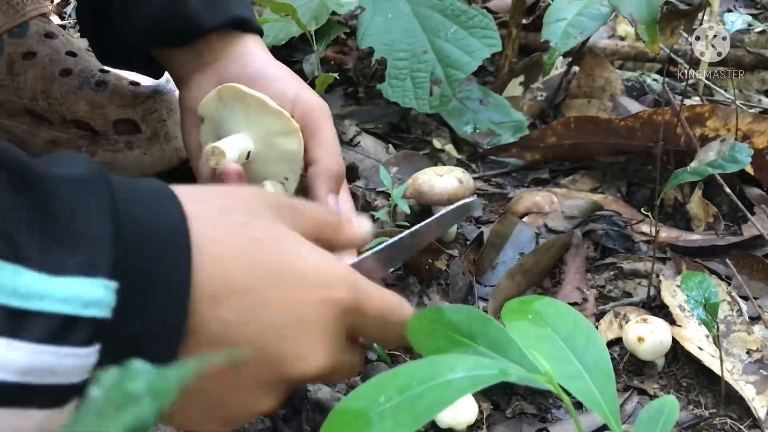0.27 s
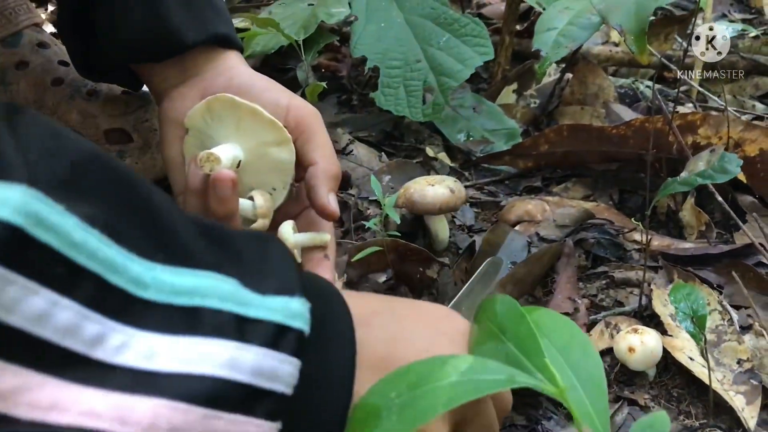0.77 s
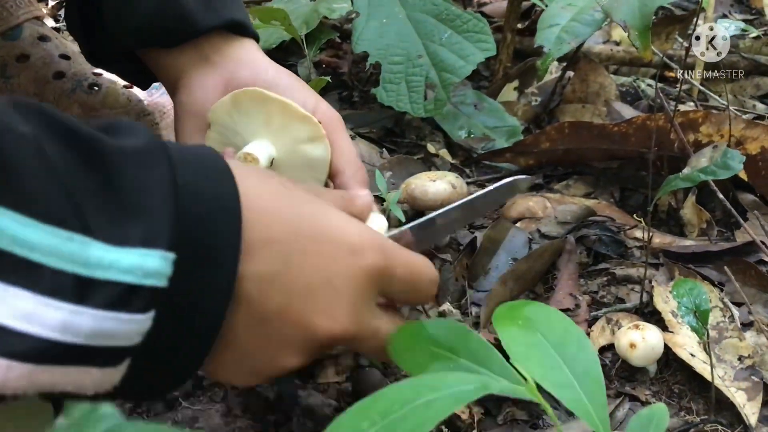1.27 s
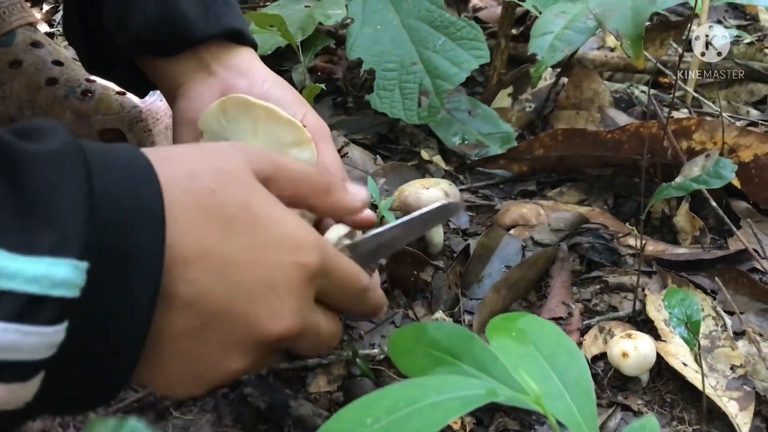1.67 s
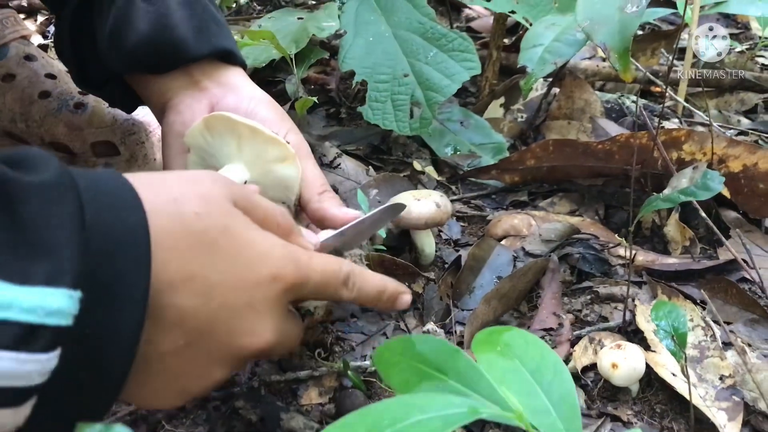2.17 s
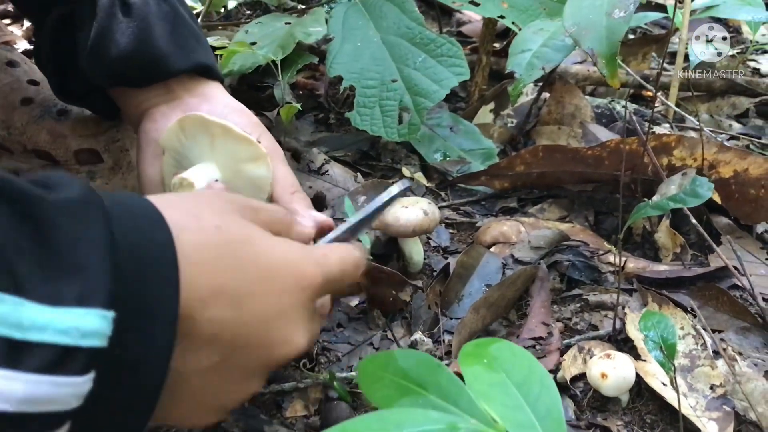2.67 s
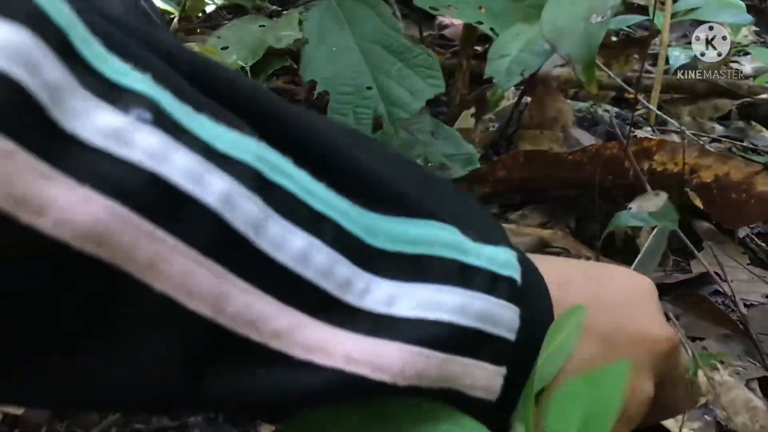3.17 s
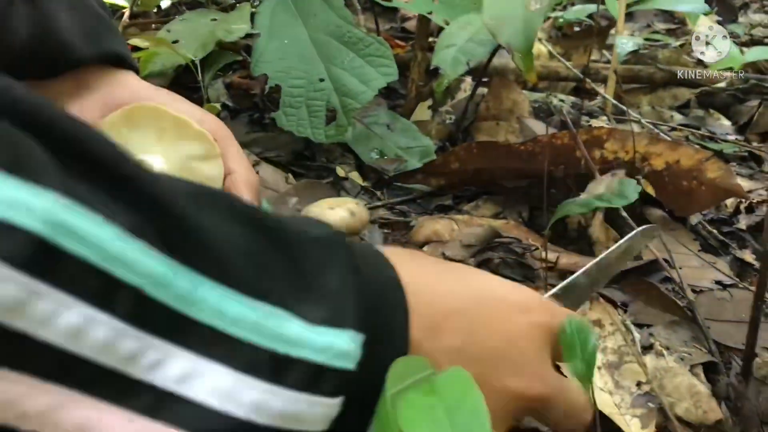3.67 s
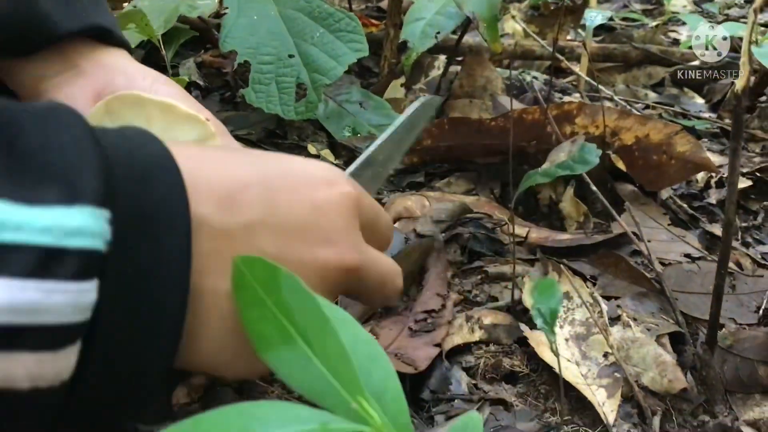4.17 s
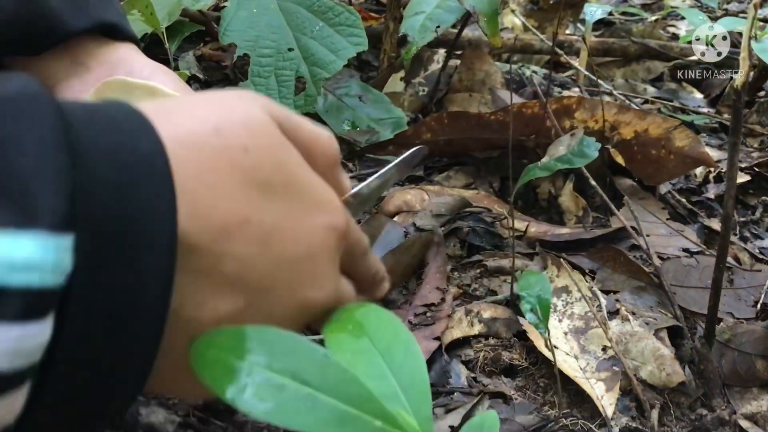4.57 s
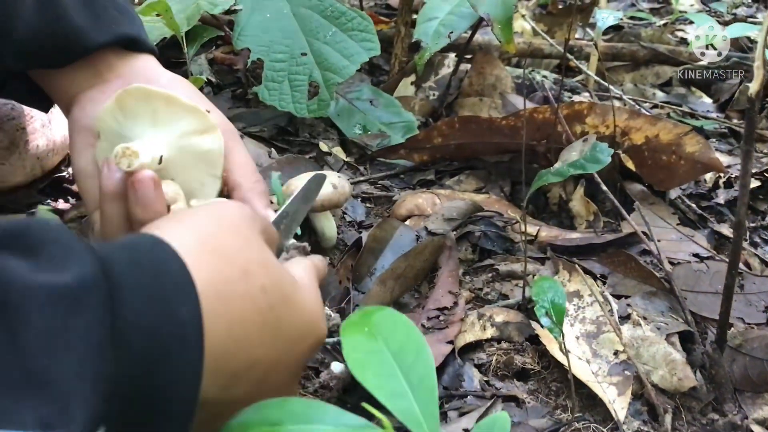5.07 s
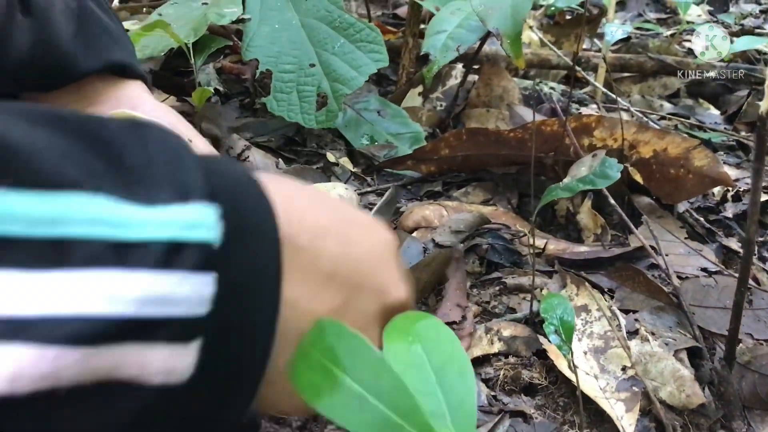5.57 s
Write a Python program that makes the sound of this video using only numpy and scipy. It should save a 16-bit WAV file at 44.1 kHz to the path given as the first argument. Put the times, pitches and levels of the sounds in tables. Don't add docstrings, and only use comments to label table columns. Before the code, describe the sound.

A steady, shrill cicada buzz fills a daytime forest while a knife clicks through stems and dry leaves crackle close by.

```python
import sys
import numpy as np
from scipy import signal
from scipy.fft import rfft, irfft, next_fast_len
from scipy.io import wavfile
from scipy.ndimage import uniform_filter1d

SR = 44100
rng = np.random.default_rng(int(sys.argv[2]) if len(sys.argv) > 2 else 0)


def wrap_up_sound(samples):
    columns = np.atleast_2d(samples).T
    tamed = np.clip(columns, -1, 1)
    steps = np.round(tamed * 32767).astype(np.int16)
    wavfile.write(sys.argv[1], SR, steps)


def gain_from_db(level_db):
    decades = np.asarray(level_db, float) / 20
    return 10 ** decades


N = 256785


def colour(x, points):
    hz, db = np.transpose(points)
    size = next_fast_len(len(x))
    f = np.maximum(np.arange(size // 2 + 1) * SR / size, 1)
    gain = gain_from_db(np.interp(np.log(f), np.log(hz), db))
    return irfft(rfft(x, size) * gain, size)[:len(x)]


def ring(x, hz, width_hz):
    b, a = signal.iirpeak(min(hz, .45 * SR), hz / width_hz, SR)
    return signal.lfilter(b, a, x)


def unit(x):
    return x / np.sqrt(np.mean(x ** 2))


def curves(table):
    s, *columns = np.transpose(table)
    return [np.interp(np.arange(N) / SR, s, column) for column in columns]


def walk(rate):
    hold = max(int(SR / rate), 2)
    steps = np.repeat(rng.standard_normal(N // hold + 1), hold)
    smooth = uniform_filter1d(uniform_filter1d(steps, hold), hold)
    return unit(smooth[:N])


def swell(start, length, rise, fall):
    along = (np.arange(N) / SR - start) / length
    return np.clip(np.minimum(along / rise, (1 - along) / fall), 0, 1)


def clicks(hz, first, last, uneven_db):
    cycles = np.cumsum(hz) / SR + rng.random()
    strengths = gain_from_db(uneven_db * rng.standard_normal(N // 50))
    size = strengths[(cycles + .5).astype(int)]
    half = np.pi * (cycles % 1) + 1e-9
    return size * (np.sin((2 * last + 1) * half) - np.sin((2 * first - 1) * half)) / np.sin(half)


def foliage(x, t60, wet_db):
    t = np.arange(SR // 2) / SR
    echo = rng.standard_normal(len(t)) * np.exp(-np.log(1000) * t / t60)
    echo *= gain_from_db(wet_db) / np.sqrt(np.sum(echo ** 2))
    echo[0] = 1
    lead_in = x[:len(t)][::-1]
    heard = signal.fftconvolve(np.concatenate([lead_in, x]), echo)
    return unit(heard[len(t):len(t) + N])


def near_cicadas():
    # (time [s], click rate [Hz], spread between singers [0-1])
    group = [(0, 294, .008), (.5, 294.5, .008), (.9, 297, .008), (1.7, 298.5, .007), (3.17, 300.3, .008),
             (3.2, 319.5, .011), (4.2, 320.4, .011), (5.82, 320.2, .011)]
    # (time [s], level [dB])
    chorus = [(0, -47.5), (.4, -48.5), (.9, -49), (1.6, -48), (2.4, -47), (3.2, -49), (3.7, -49.5),
              (4.2, -47.5), (4.8, -48), (5.3, -47), (5.82, -50.5)]
    # (frequency [Hz], gain [dB])
    tymbal = [(4000, -50), (4800, -38), (5070, -27), (5350, -18), (5650, -5), (5950, 0), (6250, -.7),
              (6570, -7.5), (6850, -8), (7050, -18), (7400, -19.5), (7700, -28), (9000, -30), (10300, -33)]
    (hz, spread), (db,) = curves(group), curves(chorus)
    out = 0
    for place in np.arange(-3, 4) / 3:
        waver = 1 + spread * place + .002 * walk(40) + .0014 * walk(4)
        strength = gain_from_db(3.2 * walk(16) - 2.5 * place ** 2)
        out = out + strength * clicks(hz * waver, 14, 34, uneven_db=1.8)
    return gain_from_db(db) * foliage(colour(out, tymbal), t60=.22, wet_db=4.5)


def far_cicada(hz, level, orders):
    cycles = np.cumsum(hz * (1 + .0003 * walk(9))) / SR
    out = 0
    for k, db in orders:
        out = out + gain_from_db(db + 0.46 * walk(4.9)) * np.cos(2 * np.pi * k * cycles + k * k)
    return gain_from_db(curves(level)[0]) * out


def far_cicadas():
    # (time [s], level [dB])
    low_level = [(0, -74), (2, -70), (3.1, -65), (4, -65), (4.6, -69), (5.3, -70), (5.82, -78)]
    high_level = [(0, -78), (.7, -72), (1, -66), (1.5, -68), (1.9, -80), (3.7, -80), (4.1, -70),
                  (5.82, -68)]
    # (multiple of the click rate, level [dB])
    low_orders = [(16, -15), (17, 2), (18, 4.5), (19, -26.5), (20, -7)]
    high_orders = [(19, -25), (20, 11), (21, -11), (22, -8)]
    return far_cicada(329.6, low_level, low_orders) + far_cicada(304.8, high_level, high_orders)


def katydid(wing, glide):
    hz, high_hz, width, low_db = wing
    rate = hz * (1 + glide + .003 * walk(5) + .002 * walk(30))
    mid = int(round(high_hz / hz / 4))
    high = clicks(2 * rate, 2 * mid - 3, 2 * mid + 3, uneven_db=2.5)
    low = clicks(rate, mid - 1, mid + 2, uneven_db=4)
    high_mode = unit(ring(ring(high, high_hz, width), high_hz, width))
    low_mode = unit(ring(low, high_hz / 4, 85))
    return foliage(high_mode + gain_from_db(low_db) * low_mode, t60=.15, wet_db=3)


def katydids():
    # (first start [s], period [s], length [s], level [dB], fading [dB/s])
    songs = [
        (-.03, .636, .44, -70, -.5),
        (-.36, .735, .72, -71.5, .2),
        (.2, .86, .56, -76.5, .1),
    ]
    # (stroke rate [Hz], high mode [Hz], width [Hz], low mode level [dB])
    wings = [
        (68.1, 10600, 260, -7),
        (68.2, 10860, 300, -9),
        (68.1, 11520, 330, -30),
    ]
    sag = .008
    t, out = np.arange(N) / SR, 0
    for (first, period, length, db, fading_db), wing in zip(songs, wings):
        along = (t - first) % period / length
        envelope = np.clip(5 * np.minimum(along, 1 - along), 0, 1)
        phrase = gain_from_db(db + fading_db * t + 1.2 * walk(3)) * envelope
        out = out + phrase * katydid(wing, -sag * (np.minimum(along, 1) - .5))
    return out


def crackle(rate, spread_db, tail_s):
    breaks = (rng.random(N) < rate / SR) * gain_from_db(spread_db * rng.exponential(size=N))
    t = np.arange(SR // 40) / SR
    return signal.fftconvolve(breaks, np.exp(-t / tail_s))[:N] * rng.standard_normal(N)


def litter():
    # (start [s], length [s], crackle level [dB], crisp top re crackle [dB])
    rustles = [(0.028, 0.015, -72, 5), (0.16, 0.4, -67, -0.5), (.36, 0.43, -63.5, -8),
               (0.556, 0.13, -69.5, 6), (0.676, 0.13, -59, -4.5), (0.81, 0.77, -70.5, -3),
               (1.17, 0.28, -65, -18), (1.383, 0.034, -53, -14), (1.647, 0.18, -61.5, -12),
               (2.06, 0.18, -69, -4), (2.316, 0.094, -69, 3), (2.39, 0.038, -55.5, -6),
               (2.452, 0.056, -56.5, -22), (2.52, 0.15, -63.5, -4), (2.71, 0.38, -67, -2),
               (2.878, 0.17, -69, 0), (2.988, 0.32, -58.5, -7.5), (3.15, 0.078, -48, -19),
               (3.209, 0.087, -57, -9), (3.27, 0.29, -64.5, -4), (3.486, 0.3, -66, -2),
               (3.662, 0.29, -67, -4), (3.85, 0.48, -61.5, -5), (4.099, 0.2, -64.5, -1),
               (4.226, 0.48, -68.5, -15), (5.307, 0.1, -64.5, 2), (5.394, 0.029, -56, -7),
               (5.465, 0.082, -65.5, 0), (5.513, 0.15, -61, 1.5), (5.604, 0.33, -61, -4.5)]
    rest_db, rest_top_db, rest_soil_db = -76, -75, -67
    soil_re_crackle_db, dig_s = -2, 0.071
    pushes = np.array([swell(s, length, rise=0.19, fall=0.83) for s, length, _, _ in rustles])
    _, length, db, top_db = np.transpose(rustles)
    push = gain_from_db(db) @ pushes
    crisp = gain_from_db(db + top_db) @ pushes
    dig = (gain_from_db(db + soil_re_crackle_db) * np.minimum(length / dig_s, 1)) @ pushes
    mid = colour(crackle(1000, 3.2, .0015), [(150, -76), (600, 4.5), (1500, -1.0), (3500, 1.5),
                                             (5000, -2.0), (8000, -10.5), (16000, -9.5)])
    top = colour(crackle(3000, 4.3, 0.002), [(3000, -18.0), (7500, -6.0), (10000, -8.5),
                                             (13000, -9), (16000, -15.0)])
    soil = colour(rng.standard_normal(N), [(25, -7.5), (60, -0.5), (200, -3.5), (450, -9.5),
                                           (1200, -21.0), (16000, -101)])
    out = np.hypot(gain_from_db(rest_db), push) * unit(mid)
    out += gain_from_db(5.5) * np.hypot(gain_from_db(rest_top_db), crisp) * unit(top)
    return out + gain_from_db(-3) * np.hypot(gain_from_db(rest_soil_db), dig) * unit(soil)


def add_impact(out, s, decay_s, modes):
    t = np.arange(SR // 15) / SR
    burst = rng.standard_normal(len(t)) * np.exp(-t / max(decay_s, 1e-4)) * np.minimum(t / 0.00034, 1)
    i = int(s * SR)
    for hz, width, db in modes:
        mode = ring(ring(burst, hz, width), hz, 1.6 * width)
        out[i:i + len(t)] += (gain_from_db(db) / np.abs(mode).max() * mode)[:N - i]


def knife():
    # (time [s], peak [dB], ring [Hz], body re peak [dB])
    snaps = [(0.0398, -24, 4000, -20.5), (0.057, -50, 3800, -6), (0.42, -48, 2650, -10),
             (0.446, -45.5, 2570, -15), (0.527, -49, 3200, -17), (0.535, -44.5, 2770, -7),
             (0.682, -46, 4380, -2), (0.693, -39, 4160, -6.5), (0.986, -51, 4400, 0),
             (1.298, -43.5, 3120, -29), (1.399, -47, 3380, -16), (1.722, -47, 4270, -5),
             (2.399, -39, 3340, -6), (2.44, -47, 2700, -4), (2.473, -46, 3000, -6), (5.343, -46, 3500, -22),
             (2.581, -47, 2400, -3), (2.903, -52, 4280, -20), (3.183, -43, 4200, 3), (3.219, -47, 2800, -2),
             (3.398, -58, 2570, 13.5), (4.021, -44, 2650, -1), (5.324, -46, 3560, -24),
             (5.398, -48, 3360, -5), (5.536, -46, 4400, -22), (5.656, -44.5, 3370, -6),
             (5.74, -53, 3430, -7), (5.784, -51.5, 3630, 7)]
    # (time [s], peak [dB], ring [Hz], body re peak [dB])
    tears = [
        (0.206, -47, 3230, -24),
        (1.383, -43, 3050, 5.5),
        (2.464, -45.5, 2650, 0.5),
        (3.17, -35, 3050, -2.5),
        (5.351, -38.5, 3340, -27),
    ]
    # (time [s], peak [dB])
    blade_taps = [(0.19, -58), (0.374, -50), (0.469, -57), (0.717, -54), (1.227, -48), (1.664, -55),
                  (2.331, -60), (2.423, -47), (2.543, -55), (2.798, -51.5), (2.927, -52), (3.7, -50.5),
                  (3.912, -51), (4.124, -62), (4.48, -51.5), (4.602, -48.5), (5.086, -56)]
    # (time [s], peak [dB], centre [Hz])
    ticks = [(0.039, -38, 14200), (0.161, -53, 12100), (0.712, -45, 12600), (1.214, -52, 12100),
             (1.719, -55, 13700), (2.068, -56, 13000), (2.3984, -39, 13300), (2.4, -37.5, 12100),
             (2.504, -47, 14800), (2.553, -52, 12600), (2.595, -51, 13200), (2.715, -47, 12800),
             (2.7232, -51, 12400), (2.7736, -47, 12800), (2.8978, -49, 13200), (3.115, -58, 12100),
             (3.16, -57, 12500), (3.2156, -53, 12400), (3.588, -44, 12300), (3.699, -44, 12800),
             (4.003, -50, 12200), (4.118, -56, 12800), (5.3228, -44, 13500), (5.35, -40.5, 13000),
             (5.4033, -42, 12600), (5.4765, -53, 12400), (5.54, -48, 15100), (5.6875, -57, 13830)]
    # (time [s], peak [dB], centre [Hz])
    thuds = [(0.046, -55, 77.5), (1.111, -51.5, 61.9), (3.049, -50, 91), (3.156, -47, 332),
             (3.189, -51, 72.7), (3.199, -59, 99), (3.25, -47, 192), (5.546, -54.5, 50), (5.659, -57, 72)]
    out = np.zeros(N)
    taps = [(s, db, 2620, -3) for s, db in blade_taps]
    for cuts, decay_s in [([*snaps, *taps], .0013), (tears, .0035)]:
        for s, db, hz, body_db in cuts:
            edge_db = -61 + 0.42 * (db + 48)
            woody = [(hz, 0.16 * hz, db - 5.0), (1.03 * hz, 0.92 * hz, db - 9)]
            body, edge = (1100, 1100, db + body_db - .7), (8800, 3000, edge_db)
            add_impact(out, s, decay_s, [*woody, body, edge])
    for s, db, hz in ticks:
        add_impact(out, s, .001, [(hz, 3500, db - 5), (11000, 6000, db + 2.5)])
    for s, db, hz in thuds:
        add_impact(out, s, .003, [(hz, 0.58 * hz, db + 1.0)])
    return out


def air():
    # (frequency [Hz], density [dB per Hz])
    spectrum = [(25, -110), (50, -83.5), (100, -89.5), (250, -96.5), (500, -101), (1000, -102),
                (2000, -106), (4000, -107), (7800, -111), (10000, -107), (12000, -109), (16000, -114)]
    out = 0
    for hz in 35 * 2 ** np.arange(0, 9):
        band = [(hz / 2, -60), (hz / 2 ** .5, -3), (hz, 0), (hz * 2 ** .5, -3), (hz * 2, -60)]
        drift = gain_from_db(2.1 * walk(3.26) + 2.2 * walk(15))
        out = out + drift * colour(rng.standard_normal(N), band)
    return colour(out, spectrum) * np.sqrt(SR / 2)


def scene():
    insects = near_cicadas() + far_cicadas() + katydids()
    hands = litter() + knife()
    return (insects + hands + air())[None]


def top_cut(x):
    return signal.sosfilt(signal.butter(12, 15780, fs=SR, output="sos"), x)


def record(dry):
    low_pass = signal.ellip(10, .2, 80, 15780, fs=SR, output="sos")
    mix = signal.sosfilt(low_pass, dry)
    return top_cut(mix)


dry = scene()
out = record(dry)
wrap_up_sound(out)
```